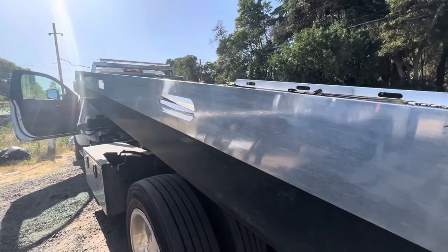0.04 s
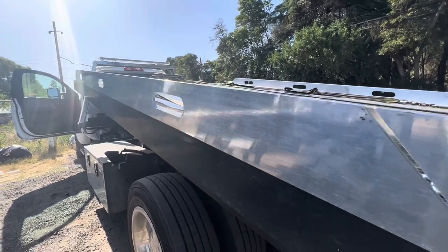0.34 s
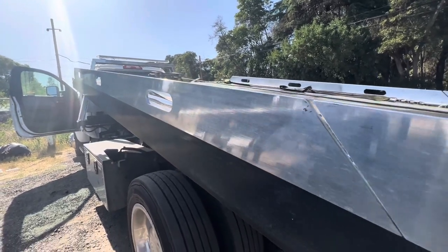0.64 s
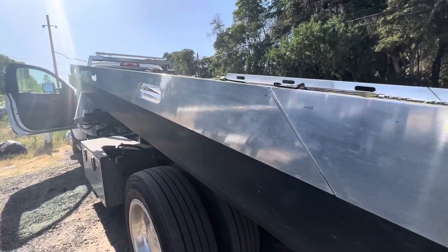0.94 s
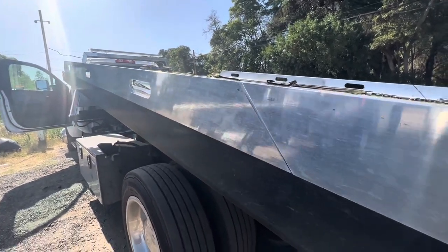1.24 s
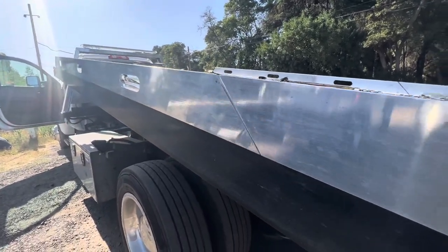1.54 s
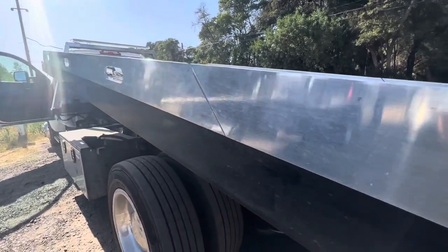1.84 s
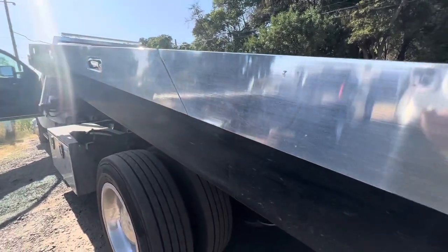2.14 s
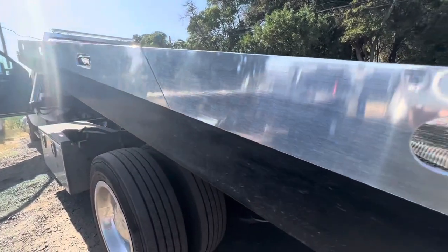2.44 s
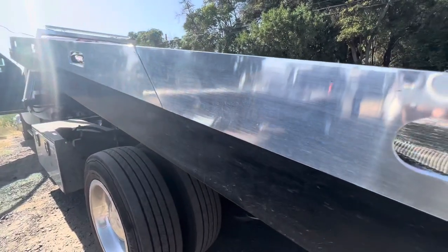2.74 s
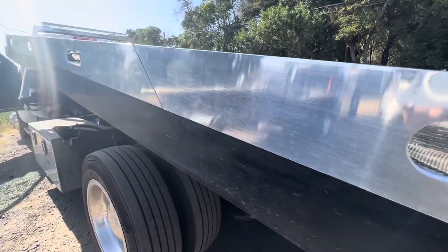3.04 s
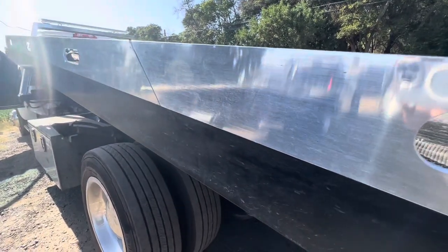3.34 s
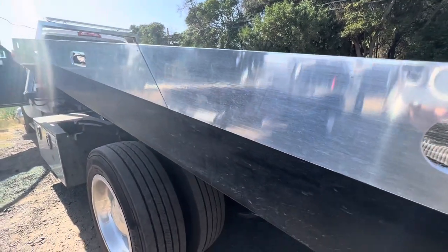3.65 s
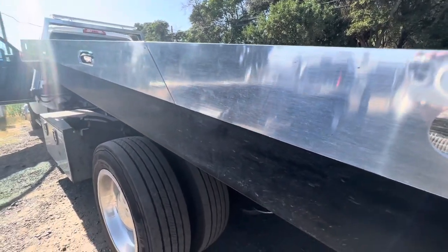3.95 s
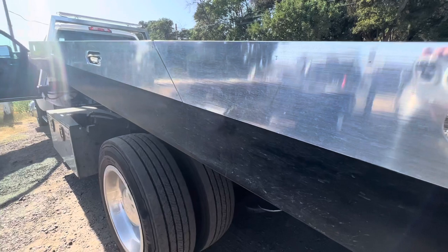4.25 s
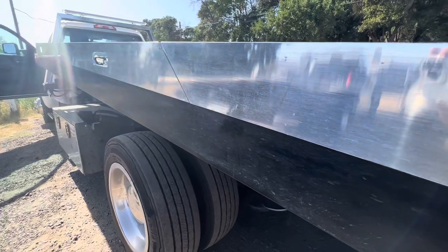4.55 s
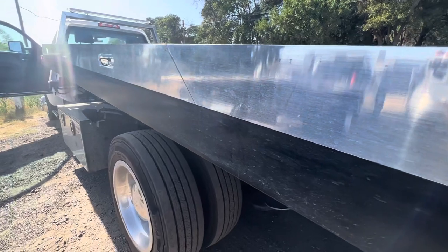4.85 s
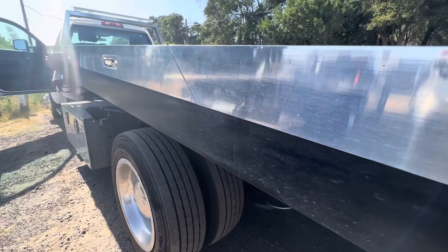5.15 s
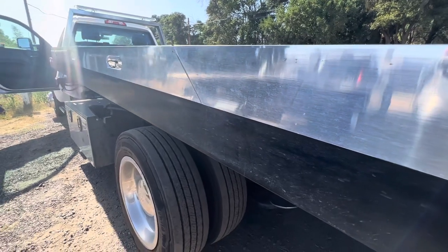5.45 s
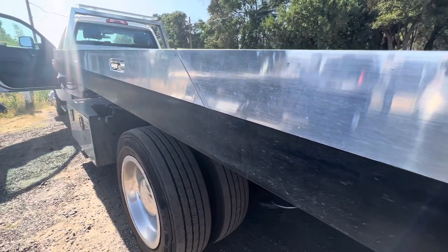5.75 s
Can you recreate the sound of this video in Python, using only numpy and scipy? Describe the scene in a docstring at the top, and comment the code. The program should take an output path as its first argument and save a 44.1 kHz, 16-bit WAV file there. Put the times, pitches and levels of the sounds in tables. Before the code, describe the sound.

A tow truck's diesel engine runs at a raised idle while a hydraulic pump hums and whines, with faint squeaks as the flatbed slides. A little before halfway the bed hits its stop with a metal clunk. The engine briefly speeds up, sags in pitch and recovers, then the whine and oil hiss grow louder as the bed tilts. It is heard outdoors, close to the rear wheel.

```python
"""A hydraulic pump hums as it slides and tilts a tow truck's flatbed, driven by a diesel V8 at a raised idle.
Piston strokes ripple the oil pressure; beneath the hum the exhaust throbs, the block knocks, gears whine
and oil hisses. The bed clunks against its stop, the valve shuts and reopens to tilt it, and the engine
sags and recovers. A phone beside the rear wheel moves slowly through the standing waves of the hum."""
import sys
import numpy as np
from scipy import signal
from scipy.fft import rfft, irfft
from scipy.io import wavfile
from scipy.ndimage import map_coordinates

SR = 44100
rng = np.random.default_rng(int(sys.argv[2]) if len(sys.argv) > 2 else 0)


def to_wav(s):
    """Save 16-bit WAV."""
    ch = np.atleast_2d(s).T  # columns
    pcm = np.round(np.clip(ch, -1, 1) * 32767)  # PCM
    wavfile.write(sys.argv[1], SR, pcm.astype(np.int16))


N = 259704
TIME = np.arange(N) / SR
FREQ = np.maximum(np.arange(N // 2 + 1) * SR / N, 1)

# the engine races when the load drops and sags when it returns: time_s, crank_speed_hz
CRANK_SPEED = [(2.46, 20.0), (2.55, 20.48), (2.72, 20.78), (2.92, 20.5), (3.02, 19.8), (3.12, 18.65),
               (3.2, 18.05), (3.28, 18.03), (3.35, 18.42), (3.53, 19.3), (3.72, 20.03), (3.85, 20.15),
               (4.02, 20.0)]
STROKES_PER_TURN = 10.425  # pump strokes to one turn of the crankshaft
PORT_LAG_SAMPLES = 12  # travel time between the phone's two microphone ports
# the work cycle: the valve shuts and reopens, the bed gathers way as it tilts, then the oil flows fully
SHUT_S, REOPEN_S, VALVE_RAMP_S = 2.53, 2.95, 0.029
TILT_S, TILT_RAMP_S = 3.72, 0.91
FLOW_S, FLOW_RAMP_S = 4.43, 0.35


def pump(turns, crank_hz):
    """Periodic piston strokes ripple the oil pressure; standing waves set each harmonic's level."""
    # standing waves of harmonics 1, 2, 3 and 5 at the phone: time_s, left_db, right_db
    first = [(0, -22.8, -24.7), (1.85, -22.3, -25), (2.4, -26, -31.5), (2.62, -35, -34), (2.76, -29.5, -29),
             (2.97, -35, -35), (3.06, -30.5, -30.5), (3.2, -27.5, -28.5), (3.28, -34, -36),
             (3.4, -28.5, -30), (3.64, -25.5, -26.5), (3.78, -33, -46), (3.88, -25, -42),
             (4.7, -25.5, -38.5), (5.89, -24, -27.5)]
    second = [(0, -40, -60), (.55, -47.5, -38), (.85, -36, -23), (1.7, -22, -21.5), (2.2, -23, -29.5),
              (2.5, -36, -37.5), (2.95, -44, -35.5), (3.1, -32.5, -34.5), (3.55, -30.5, -30),
              (3.72, -26, -35), (3.95, -31.5, -34), (4.2, -27, -29.5), (4.65, -24.5, -25),
              (5.1, -29, -25.5), (5.89, -29.5, -31)]
    third = [(0, -51, -38), (.4, -39, -38), (.65, -45.5, -52), (1.4, -42, -38), (2.2, -40, -42.5),
             (2.7, -49.5, -49), (3.27, -36, -40), (3.44, -42, -49), (3.58, -39.5, -31), (3.75, -44, -45),
             (4.0, -48, -48), (4.2, -41, -38), (4.9, -30, -32), (5.89, -31, -31)]
    fifth = [(0, -43.5, -43), (.6, -35.5, -42), (1.2, -44, -54), (1.8, -31.5, -36), (2.1, -37.5, -38.5),
             (2.7, -50, -52), (3.3, -40, -46), (3.6, -31.5, -42), (3.95, -38, -46), (4.12, -44, -44),
             (4.95, -29.5, -35), (5.6, -35, -50), (5.89, -31, -44)]
    # sustained part of the tenth harmonic: time_s, level_db
    tenth = [(0, -52), (.7, -50), (1.5, -52), (1.8, -56), (2.3, -53), (2.7, -60), (3.75, -60), (4.2, -44),
             (4.7, -48), (5.2, -53), (5.89, -50)]
    # the tenth flares into squeaks while the bed slides: centre_s, length_s, level_db
    squeaks = [(.16, .11, -44), (.34, .095, -42), (.5, .11, -41.5), (.69, .13, -39.5), (.82, .05, -39.5),
               (.88, .045, -39.5), (.98, .06, -41.5), (1.16, .09, -42), (1.36, .1, -45.5),
               (1.48, .09, -43.5), (1.65, .06, -45)]
    # weaker partials of the nine-piston shaft: shaft_order, left_db, right_db
    shaft_lines = [(10, -46, -48), (19, -53, -57), (36, -45, -45), (54, -48, -51), (63, -48, -55),
                   (72, -54, -57), (81, -56, -58)]
    sway = 0.0026 * np.sin(2 * np.pi * turns) + 0.0014 * walk(27.9)  # the crank turns unevenly
    strokes = STROKES_PER_TURN * turns + sway
    stroke_hz = STROKES_PER_TURN * curves(CRANK_SPEED)[0]
    # a panel resonates as the hum sweeps through its note
    panel_hz, panel_width_hz = 197.7, 7.8
    panel_db = 6 * np.exp(-((stroke_hz - panel_hz) / panel_width_hz) ** 2)
    hum = tone(strokes, curves(first) + panel_db, lag=0.524, flutter=0.013)
    hum += tone(2 * strokes, curves(second), lag=0.77, flutter=0.039)
    labouring = ramp(SHUT_S, VALVE_RAMP_S) - ramp(TILT_S, VALVE_RAMP_S)
    ragged = strokes + .032 * walk(45) * labouring
    whine = tone(3 * ragged, curves(third), lag=2.07, flutter=0.167)
    whine += tone(5 * ragged, curves(fifth), lag=1.72, flutter=0.11)
    squeaking = sum(undb(db) * bout(s, length) for s, length, db in squeaks) * undb(pan(3))
    waver_db = 4 * np.array([walk(14), walk(14)])
    tenth_gain = np.hypot(undb(curves(tenth) + pan(1) + waver_db), squeaking)
    whine += tenth_gain * tone(10 * ragged, 0, lag=1.7, flutter=.25)
    shaft = partials(ragged / 9, STROKES_PER_TURN * crank_hz / 9, shaft_lines, flutter=0.57)
    return hum + whine + shaft * work_gain(-1, shut_db=-3.5, tilt_db=2, flow_db=-4)


def exhaust(turns, crank_hz):
    """Four pressure pulses a turn make the firing tone; unequal banks add half orders that lope."""
    # slow throb of the firing tone: time_s, level_db
    throb = [(0, -38), (.45, -45), (1.0, -40), (1.35, -42), (1.5, -35), (1.75, -38), (2.35, -30.5),
             (2.8, -36), (3.05, -44), (3.28, -31), (3.6, -46), (3.83, -30), (4.05, -46), (4.3, -30.5),
             (4.6, -29), (4.9, -31), (5.08, -33), (5.2, -43), (5.3, -32), (5.46, -26.5), (5.57, -31),
             (5.64, -46), (5.72, -30), (5.85, -27)]
    # exhaust partials: crank_order, left_db, right_db
    orders = [(2, -54, -54), (2.5, -38, -38), (3, -39, -39), (3.5, -45, -46), (5.5, -41, -41),
              (8, -48, -49), (9.5, -44, -44), (13.5, -45, -43), (15.5, -54, -50), (18, -53, -54),
              (19, -55, -53), (25, -57, -59)]
    lope = partials(turns, crank_hz, orders, flutter=0.0355)
    lope *= work_gain(-1.5, shut_db=0.37, tilt_db=0.94, flow_db=-0.23)
    return lope + tone(4 * turns, curves(throb), lag=0.22, flutter=0.075)


def knock(turns):
    """Each firing shock-excites the block; part of the clatter repeats with every engine cycle."""
    # spectral envelope of the block: frequency_hz, gain_db
    block_spectrum = [(35, -17), (74, -7.5), (149, -11), (208, -9), (316, -15), (426, -11), (540, -22),
                      (660, -23.5), (950, -17), (1400, -21), (1720, -27), (2150, -27.5), (2300, -27),
                      (2560, -26.5), (3300, -33.5), (4500, -39), (8800, -86)]
    balance = undb(pan(5 + 1.7 * walk(1.846)))
    firings = 4 * turns
    cylinder = firings.astype(int) % 8
    blow_db = 1.1 * rng.standard_normal(8)[cylinder] + 1.4 * np.cos(2 * np.pi * turns) + 1.1 * walk(40)
    bursts = unit(0.33 + undb(blow_db) * np.exp(-(firings % 1) / 2))
    cycle_noise = rng.standard_normal((3, SR // 10))
    cycle_position = (turns / 2 % 1) * cycle_noise.shape[1]
    repeating = np.array([np.interp(cycle_position, np.arange(len(row)), row) for row in cycle_noise])
    block = shape(block_spectrum)
    block /= np.sqrt(np.sum(block[(FREQ > 680) & (FREQ < 1000)] ** 2) / len(FREQ))
    bass = block / (1 + (FREQ / 600) ** 2)  # rumbles evenly; only the rest comes in bursts
    clatter = ports((noise() + 0.74 * repeating) * bursts, diffuse=0.97) * balance
    rumble = ports(noise(), diffuse=0.133 + FREQ / 1800)
    # a brief, harder clatter as the bed hits its stop
    hard = unit(filtered(clatter, resonance(hz=2800, width_hz=900) ** 2)) * undb(-8) * bout(2.5, 0.3)
    body = undb(1) * filtered(clatter, block - bass) + undb(-1) * filtered(rumble, bass)
    return (body + hard) * work_gain(-43, shut_db=-1, tilt_db=3.5, flow_db=-1.5)


def oil(turns):
    """A turbulent jet hisses in the valve, pulsing with the pump and exciting the oil lines' modes."""
    # spectrum of the jet: frequency_hz, gain_db
    jet_spectrum = [(900, -14), (2000, -5), (3500, -4.5), (3850, -1.5), (4700, -1), (5250, -2), (5850, -.5),
                    (7000, -2.5), (8200, -5.5), (9400, -6.5), (10500, -9.5), (15500, -11)]
    # acoustic shadow at the right port: frequency_hz, gain_db
    right_shadow = [(1500, -2), (3000, -5), (4500, -10), (6700, -13), (8500, -1), (9500, 1), (15000, 0)]
    # modes of the pressurised lines: pitch_hz, width_hz, gain_db
    pipe_modes = [(2425, 40, 5), (3135, 70, 1.5), (4070, 35, -4), (4165, 40, -2.5), (4517, 35, 1.5),
                  (4718, 45, 3.5), (4930, 960, -10), (5367, 30, -3), (6760, 40, -6), (6905, 45, -1.5),
                  (7386, 45, -3.5), (7790, 20, -4), (8400, 200, -7), (8830, 90, -2), (9254, 70, 3),
                  (9365, 35, 4)]
    pulsing = 1 + 0.032 * np.sin(2 * np.pi * STROKES_PER_TURN * turns) + 0.095 * walk(49)
    jet = ports(noise() * pulsing, diffuse=.8 / (1 + (FREQ / 9500) ** 4))
    jet = filtered(jet, shape(jet_spectrum) * np.array([np.ones(len(FREQ)), shape(right_shadow)]))
    strain = undb(0.98 * bout(3.5, 1))  # the oil strains to get the bed moving again
    surge = undb(2.45 * bout(5.32, .7) + .35 * walk(6.2))  # the lines sing loudest at peak flow
    singing = filtered(jet, modes(pipe_modes)) * strain * surge
    singing *= work_gain(-1, shut_db=-13, tilt_db=2, flow_db=5)
    sliding = 1 - ramp(SHUT_S, VALVE_RAMP_S)
    valve_ring = filtered(jet, undb(-3) * resonance(hz=5800, width_hz=700)) * sliding
    hiss = unit(jet + singing + valve_ring) * strain
    return hiss * work_gain(-41, shut_db=-2.5, tilt_db=2.5, flow_db=4.5)


def gears(turns, crank_hz):
    """Backlash phase-modulates a 64-tooth gear's whine; its second harmonic swells to a squeal."""
    # standing wave of the mesh tone: time_s, left_db, right_db
    mesh_levels = [(0, -44, -55), (.5, -40.5, -49), (1.3, -45, -59), (1.7, -39, -54), (2.3, -42, -49),
                   (3.0, -40, -56), (3.2, -33.5, -50), (3.55, -43, -57), (3.85, -32.5, -44),
                   (4.3, -30.5, -37), (4.7, -38, -42), (5.15, -39.5, -41), (5.5, -35.5, -39.5),
                   (5.89, -36.5, -39)]
    # bouts of squeal: centre_s, length_s, level_db, roughness (0-1)
    squeals = [(.57, .2, -41.5, .65), (.72, .05, -47, .8), (1.06, .15, -40.5, .2), (3.01, .03, -43, 1),
               (3.052, .03, -39, .4), (3.085, .024, -33.5, .35), (3.365, .025, -43, 1),
               (3.415, .04, -37.5, .3), (3.467, .055, -36, .3), (3.54, .09, -39.5, .3),
               (3.67, .05, -41.5, .3)]
    # timing-gear partials: crank_order, left_db, right_db, tilt_gain_db
    timing_lines = [(40, -52, -56, -2), (62.5, -48, -52, -4), (65.5, -51, -55, -3), (73, -50, -55, 2),
                    (91, -50, -58, -8), (99, -55, -61, 0), (109, -54, -55, 5), (121, -50, -56, 4),
                    (123, -57, -61, 2), (127, -54, -60, 0), (130, -52, -58, -4), (132, -58, -62, 4),
                    (139, -60, -60, -2), (151, -56, -64, -4)]
    tilting = ramp(TILT_S, TILT_RAMP_S)
    labour = .3 + .7 * (ramp(REOPEN_S, VALVE_RAMP_S) - tilting)
    backlash = .075 * labour * walk(70) + .025 * np.sin(2 * np.pi * turns)
    mesh = 64 * turns
    sustained = work_gain(-52, shut_db=-4, tilt_db=1.5, flow_db=1.5) * (1.3 - labour)
    squeal = sustained * tone(2 * mesh + backlash, 2.2 * walk(40), lag=1.0, flutter=.15)
    chatter, rasp = 0.21 * walk(85), undb(3 * walk(45))
    for s, length, db, roughness in squeals:
        envelope = bout(s, length, steepness=4) * rasp ** roughness
        squeal += envelope * tone(2 * mesh + roughness * chatter, db + pan(3), lag=1.0, flutter=.1)
    timing = sum(partials(turns, crank_hz, [line], flutter=0.576) * undb(tilt_db * tilting)
                 for *line, tilt_db in timing_lines)
    timing *= work_gain(-0.5, shut_db=-18, tilt_db=-2.5, flow_db=5)
    return tone(mesh + backlash, curves(mesh_levels), lag=1.58, flutter=0.15) + squeal + timing


def clunk(t60_s=0.1):
    """Impacts on the rails excite the bed's modes, each with a dull push and a short bright rattle."""
    # impacts: start_s, level_db, brightness_hz
    blows = [(2.4385, -23, 3000), (2.4435, -20.7, 3000), (2.4444, -29, 280), (2.451, -27, 1710),
             (2.458, -23, 750), (2.465, -22.5, 295), (2.467, -26.5, 1800), (2.478, -24, 1150),
             (2.484, -25.5, 1300), (2.485, -35, 6500), (2.489, -22.5, 272), (2.492, -23, 1200),
             (2.507, -28, 900), (2.545, -36, 2200), (2.55, -31, 330), (2.562, -32, 1100),
             (2.687, -44, 2000)]
    # modes of the bed: pitch_hz, width_hz, gain_db
    bed_modes = [(190, 38, 15.5), (347, 21, 13.5), (750, 33, 14), (1035, 160, 12), (1220, 74, 16),
                 (1600, 250, -5), (2070, 350, 3.5), (2780, 250, -7), (3320, 300, -16), (6260, 3000, -6.5)]
    deck = modes(bed_modes)
    push = undb(31) / (1 + 1j * FREQ / 450) ** 2
    high_pass = 1 / (1 + 350 / (1j * FREQ))
    spectrum = 0
    for s, db, hz in blows:
        decay = (TIME >= s) * np.exp(-np.log(1000) * np.abs(TIME - s) / t60_s)
        force = high_pass * rfft(noise() * decay) + push * np.exp(-2j * np.pi * FREQ * s)
        colour = deck * resonance(hz, width_hz=hz) / (1 + (FREQ / 9000) ** 4)
        spectrum += undb(db) * force * unit(colour)
    return ports(irfft(spectrum, N), diffuse=FREQ / 1500)


def drones():
    """Faint low tones swell, glide to a steady pitch and fade."""
    # gliding tones: start_s, length_s, first_hz, last_hz, glide_s, level_db
    notes = [(0.906, 1.03, 108, 124, 0.55, -35.5), (2.65, 0.54, 123.8, 119.2, 0.24, -37),
             (3.75, 0.9, 93.1, 93.7, 0.82, -31), (4.738, 1.4, 167, 146.7, .25, -40)]
    out = 0
    for s, length, first_hz, last_hz, glide_s, db in notes:
        age = np.clip(TIME - s, 0, length)
        hz = last_hz + (first_hz - last_hz) * np.exp(-(age / glide_s) ** 2)
        out += np.sin(np.pi * age / length) * tone(np.cumsum(hz) / SR, db, lag=0.31, flutter=0.092)
    return out


def air_rush():
    """Cooling air excites a cavity resonance in the gap between bed and chassis."""
    # the rush swells as the bed tilts: time_s, level_db
    swell = [(0, -75), (2.85, -60), (4.0, -35), (4.35, -35), (5.0, -39), (5.89, -43)]
    air = filtered(ports(noise(), diffuse=0.66), resonance(hz=880, width_hz=390) ** 2)
    return unit(air) * undb(curves(swell)[0] + 2.2 * walk(13))


def bed_chirps():
    """Stick-slip friction of the bed briefly rings one rough note."""
    # slips: centre_s, length_s, pitch_hz, level_db
    slips = [(3.203, .028, 3445, -46), (3.256, .022, 3440, -46), (3.307, .02, 3450, -46.5)]
    return sum(bout(s, length) * tone(hz * TIME + 0.11 * walk(200), db, lag=0.49, flutter=.1)
               for s, length, hz, db in slips)


def valve_whistle(start_s=3.06, length_s=.63, pitch_hz=4505, waver_hz=48):
    """Flow through the valve sounds a thin, unsteady tone while the pump takes up the load."""
    held = ramp(start_s, VALVE_RAMP_S) - ramp(start_s + length_s, VALVE_RAMP_S)
    level_db = -57.5 + 5 * np.clip((TIME - start_s) / length_s, 0, 1)
    cycles = np.cumsum(pitch_hz + waver_hz * walk(130)) / SR
    return held * tone(cycles, level_db + pan(7), lag=.5, flutter=.2)


def work_gain(start_db, shut_db, tilt_db, flow_db):
    """Level follows load: each stage of the work cycle adds its decibels to the starting gain."""
    db = start_db + 1.14 * ramp(1.77, 1.8)  # slightly louder as the bed nears its stop
    db += shut_db * (ramp(SHUT_S, VALVE_RAMP_S) - ramp(REOPEN_S, VALVE_RAMP_S))
    return undb(db + tilt_db * ramp(TILT_S, TILT_RAMP_S) + flow_db * ramp(FLOW_S, FLOW_RAMP_S))


def tone(cycles, db, lag, flutter):
    """A partial at both ports; the left trails by lag radians, and moving air modulates both."""
    phase = 2 * np.pi * (cycles + rng.random()) - np.array([[lag], [0]])
    in_phase = np.sin(phase) * (1 + flutter * walk(11.5))
    quadrature = np.cos(phase) * flutter * walk(7.4)
    return np.sqrt(2) * undb(db) * (in_phase + quadrature)


def partials(turns, shaft_hz, table, flutter):
    """Rotation radiates a line spectrum at multiples, or orders, of the shaft's rate."""
    lag = 2 * np.pi * shaft_hz * PORT_LAG_SAMPLES / SR
    return sum(tone(order * turns, np.array([[left_db], [right_db]]), order * lag, flutter)
               for order, left_db, right_db in table)


def ports(x, diffuse):
    """Direct sound (row 0) reaches the right port first; the diffuse share (rows 1, 2) is incoherent."""
    share = np.clip(diffuse, 0, 1)
    direct = np.array([np.roll(x[0], PORT_LAG_SAMPLES), x[0]])
    return filtered(direct, np.sqrt(1 - share)) + filtered(x[1:], np.sqrt(share))


def noise():
    """Three independent white noises: one direct, two diffuse."""
    return rng.standard_normal((3, N))


def pan(db):
    """Left and right offsets for a level difference of db, left minus right."""
    return np.array([[.5], [-.5]]) * db


def resonance(hz, width_hz):
    """Complex response of a damped oscillator, gain 1 at its centre."""
    return 1 / (1 + 1j * (FREQ / hz - hz / FREQ) * hz / width_hz)


def modes(table):
    """A body's response is the superposition of its resonances."""
    return sum(undb(db) * resonance(hz, width_hz) for hz, width_hz, db in table)


def shape(points):
    """Gain at every frequency from rows of frequency_hz, gain_db."""
    hz, db = np.transpose(points)
    return undb(np.interp(np.log(FREQ), np.log(hz), db))


def filtered(x, response):
    """A linear filter multiplies the spectrum by its response."""
    return irfft(rfft(x) * response, N)


def curves(table):
    """The columns of a table of timed rows, interpolated to every sample."""
    times, *columns = np.transpose(table)
    return np.array([np.interp(TIME, times, column) for column in columns])


def walk(rate_hz):
    """Smooth random fluctuation of spread about 1, mostly slower than rate_hz."""
    steps = rng.standard_normal(int(2 * rate_hz * N / SR) + 2)
    return map_coordinates(steps, [2 * rate_hz * TIME], order=2, mode="mirror")


def ramp(centre_s, length_s):
    """A smooth step from 0 to 1."""
    return .5 + .5 * np.sin(np.pi * np.clip((TIME - centre_s) / length_s, -.5, .5))


def bout(centre_s, length_s, steepness=2):
    """A bell-shaped swell; greater steepness flattens its top."""
    return np.exp(-(2 * (TIME - centre_s) / length_s) ** steepness)


def undb(db):
    """Decibels to gain."""
    return 10 ** (np.asarray(db) / 20)


def unit(x):
    """Scale to rms 1."""
    return x / np.sqrt(np.mean(np.abs(x) ** 2))


def scene():
    """The sources superpose; one crankshaft locks pump, firings and gears in phase."""
    speed_hz = curves(CRANK_SPEED)[0]
    turns, crank_hz = np.cumsum(speed_hz) / SR, speed_hz.mean()
    engine = exhaust(turns, crank_hz) + knock(turns) + gears(turns, crank_hz) + air_rush()
    hydraulics = pump(turns, crank_hz) + oil(turns) + valve_whistle()
    return hydraulics + engine + drones() + clunk() + bed_chirps()


def record(dry):
    """The phone acts as a band-pass filter, cutting the deep bass and the top."""
    high_pass = signal.butter(4, 38, "high", fs=SR, output="sos")
    low_pass = signal.ellip(10, .2, 80, 15750, fs=SR, output="sos")
    return signal.sosfilt(low_pass, signal.sosfilt(high_pass, dry))


dry = scene()
out = record(dry)
to_wav(out)
```